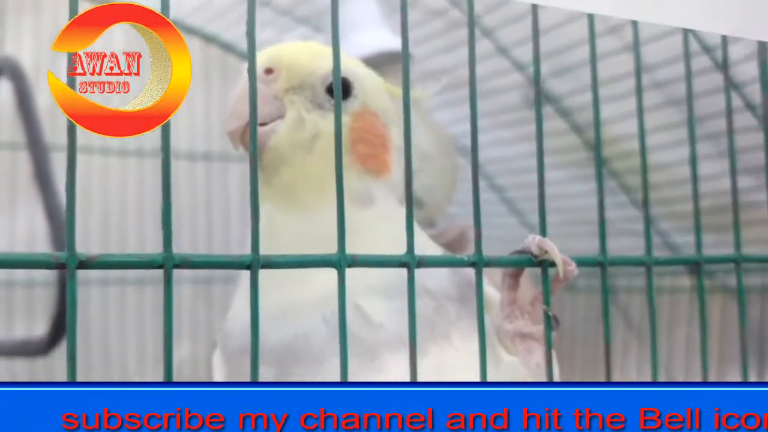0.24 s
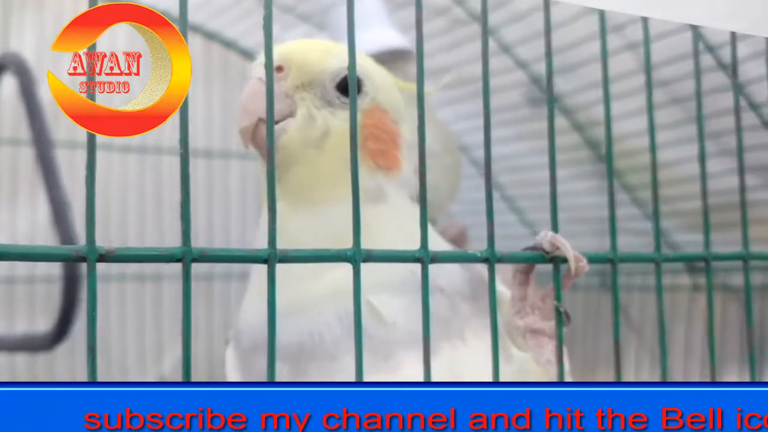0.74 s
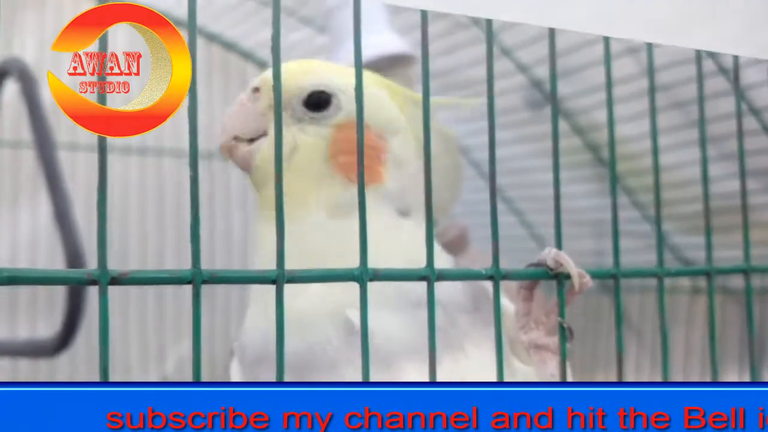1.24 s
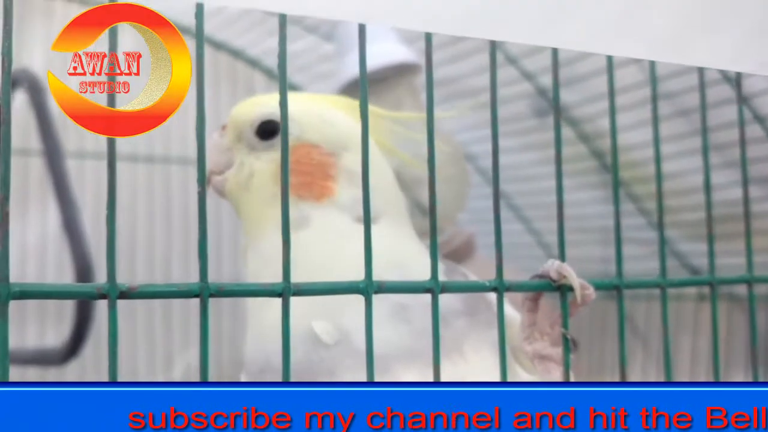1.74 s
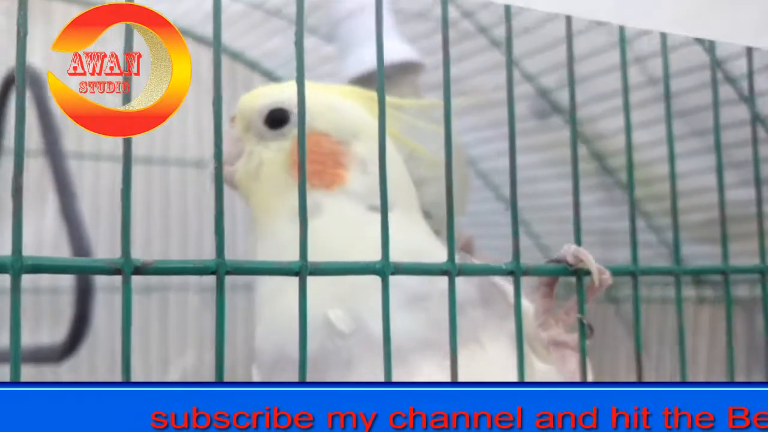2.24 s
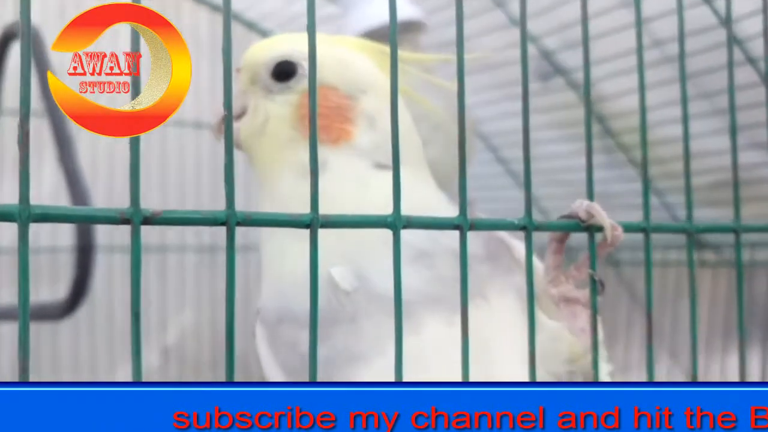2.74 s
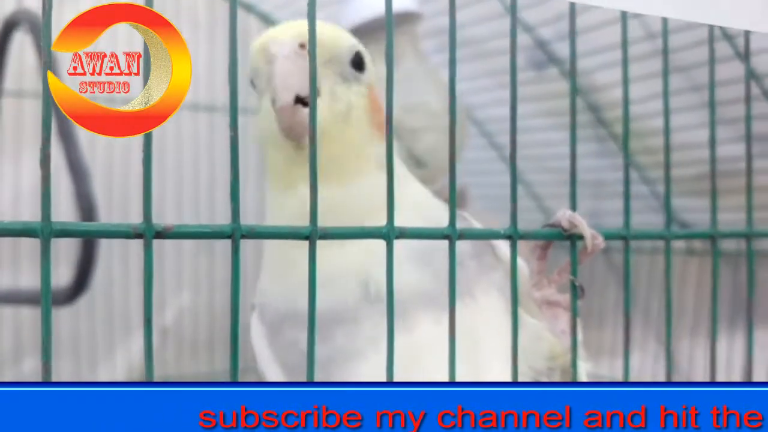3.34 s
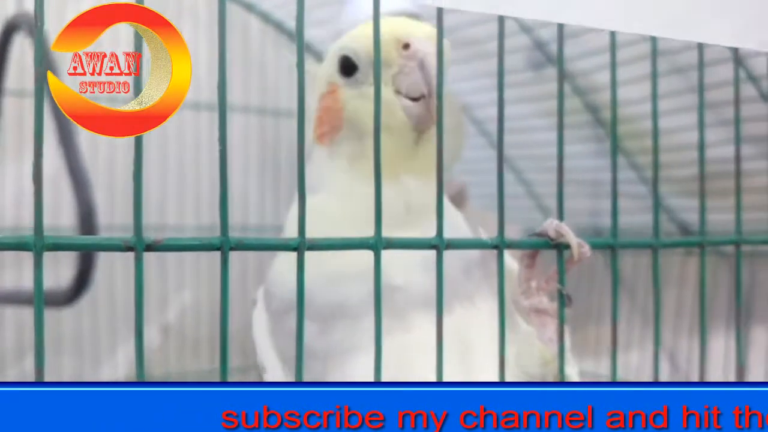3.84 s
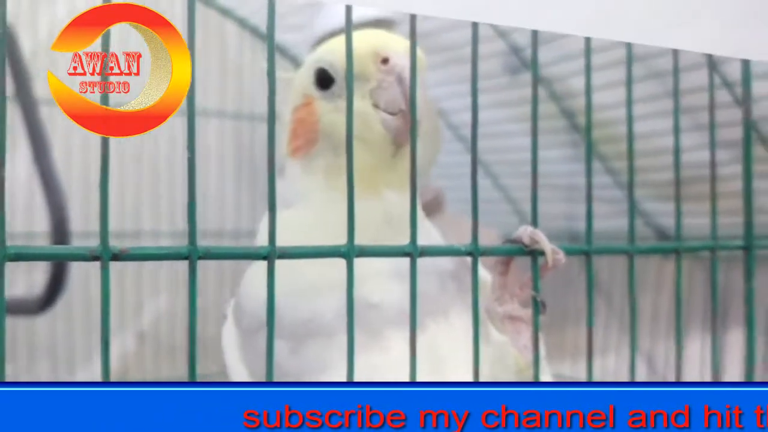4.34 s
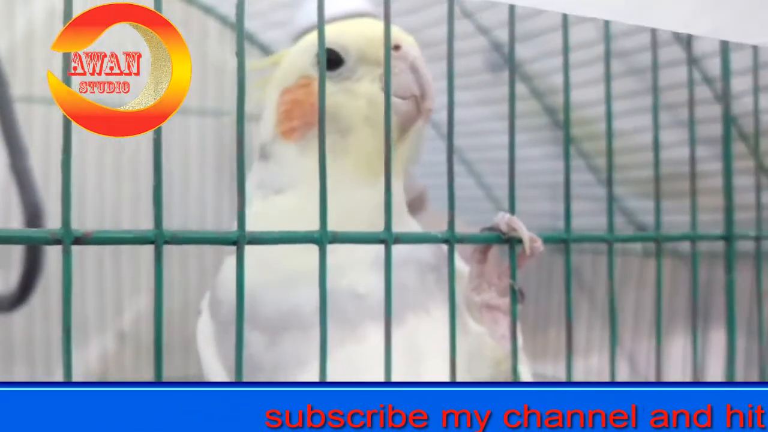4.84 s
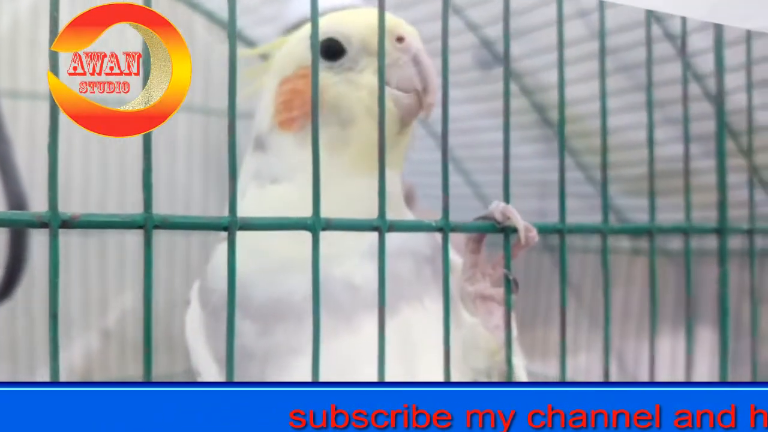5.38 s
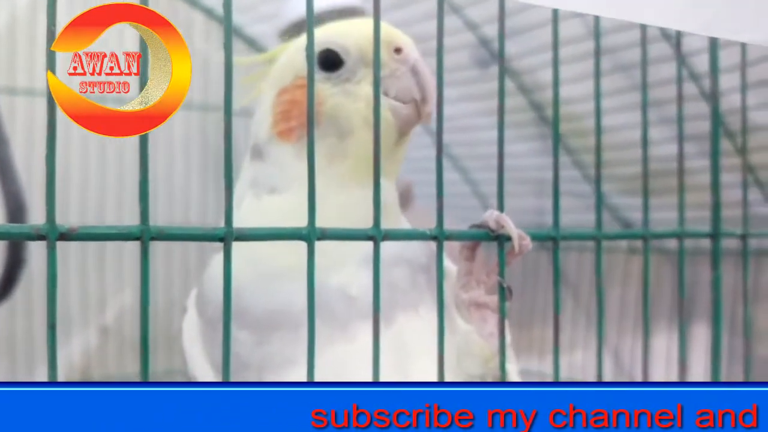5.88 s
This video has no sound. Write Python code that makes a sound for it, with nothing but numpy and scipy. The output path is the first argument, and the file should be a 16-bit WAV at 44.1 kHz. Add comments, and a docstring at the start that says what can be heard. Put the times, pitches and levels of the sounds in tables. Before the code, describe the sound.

A cockatiel whistles close to the microphone in a quiet, hard-walled room. Each note is high, nearly pure and under a tenth of a second long, most holding briefly and then dropping sharply, with a short room echo. From the start to about 1.7 seconds the notes come roughly five a second. In the short pause that follows, a faint distant whistle sinks slightly until 2.2 seconds. From 2.4 to 5 seconds the bird chirps in a louder, quick run, some notes sharper in tone, then spaces them a little more until about 6 seconds. A few softer, lower notes fall in between. Soft handling thumps touch the left side at about 0.2 seconds, cluster from 2.4 to 3.2, and return at 3.5 with a small bright click and at 4.1. Faint room hiss and a low hum continue throughout.

```python
"""Short falling whistles from a cockatiel on its cage bars, close to a small stereo recorder.
Each note is a near sine from the syrinx that drops as the breath gives out; the hard-walled room answers.
Behind the bird are room tone, a low hum and one faint far whistle. Soft handling thumps reach the left
microphone, one with a bright click. A fast ripple in the recorder's gain mirrors every tone around
multiples of the ripple frequency."""
import sys
import numpy as np
from scipy import signal
from scipy.fft import rfft, irfft
from scipy.io import wavfile
from scipy.ndimage import uniform_filter1d

SR = 44100
rng = np.random.default_rng(int(sys.argv[2]) if len(sys.argv) > 2 else 0)


def pcm_store(signal):
    """Save signal as 16-bit PCM."""
    levels = np.round(np.clip(np.atleast_2d(signal), -1, 1) * 32767)
    wavfile.write(sys.argv[1], SR, levels.astype(np.int16).T)


N = 269451


def amp(db):
    return 10 ** (np.asarray(db) / 20)


def unit_rms(x):
    return x / np.sqrt(np.mean(x ** 2) + 1e-20)


def curve_at(points, hz):
    """Reads a table of (frequency, value) along a log frequency axis."""
    freq_hz, value = np.transpose(points)
    return np.interp(np.log(hz + 1), np.log(freq_hz + 1), value)


def add(mix, start_s, sound):
    part = mix[max(round(start_s * SR), 0):][:len(sound)]
    part += sound[:len(part)]


def drift(size, smooth_s):
    """A smooth random wander of rms 1."""
    span = max(round(smooth_s * SR), 1)
    return unit_rms(uniform_filter1d(uniform_filter1d(rng.standard_normal(size), span), span))


def bend(x, start, mid, end):
    """The parabola through three values at x = 0, 1/2 and 1."""
    return start * (1 - x) * (1 - 2 * x) + 4 * mid * x * (1 - x) + end * x * (2 * x - 1)


# The quiet room's spectrum at the microphones: freq_hz, relative_density_db
ROOM_TONE_SPECTRUM = [(25, -30.5), (110, -16), (240, -24.5), (450, -21.5), (900, -27), (1250, -17),
                      (1850, -14.5), (2100, -41.5), (2600, -24), (3400, -32), (6000, -48), (13500, -48),
                      (15100, -45), (15900, -52)]


def room_tone(rms_db=-57, patch_db=3.9):
    """Noise all around, unrelated at the two microphones, with louder and softer patches."""
    hz = np.fft.rfftfreq(1024, 1 / SR)
    real, imag, patches = rng.standard_normal((3, 2, len(hz), N // 256 + 5))
    patches = unit_rms(uniform_filter1d(uniform_filter1d(patches, 8, axis=1), 10, axis=2))
    spectra = (real + 1j * imag) * amp(curve_at(ROOM_TONE_SPECTRUM, hz)[:, None] + patch_db * patches)
    noise = signal.istft(spectra, nperseg=1024, noverlap=768)[1][:, :N]
    return amp(rms_db) * unit_rms(noise)


def hum(pitch_hz=150.4, width_hz=33, level_db=-66):
    """A low hum in the room that wavers differently at each microphone."""
    waver = np.array([drift(N, .5 / width_hz) for _ in range(2)])
    tone = np.sin(2 * np.pi * pitch_hz * np.arange(N) / SR)
    return amp(level_db + drift(N, .37)) * waver * tone


# A faint whistle sinking, far from the microphones: time_s, pitch_hz, level_db
FAR_WHISTLE_PATH = [(1.72, 1340, -80), (1.8, 1310, -60), (2.0, 1260, -59), (2.17, 1225, -61),
                    (2.22, 1215, -80)]


def far_whistle():
    """A thin, distant tone that the room smears differently at each microphone."""
    time_s, pitch_hz, level_db = np.transpose(FAR_WHISTLE_PATH)
    t = np.arange(N) / SR
    phase = 2 * np.pi * np.cumsum(np.interp(t, time_s, pitch_hz)) / SR
    level = amp(np.interp(t, time_s, level_db, left=-200, right=-200))
    return np.array([level * amp(3 * drift(N, .015)) * np.sin(phase + .4 * drift(N, .03))
                     for _ in range(2)])


# Handling knocks, right at the left microphone: centre_s, level_db, pitch_hz
HANDLING_KNOCKS = [(0.162, -31, 260), (0.24, -42, 111), (2.389, -36, 130), (2.477, -41.5, 99),
                   (2.516, -43, 119), (2.532, -40, 176), (2.557, -43, 118), (2.587, -39, 264),
                   (2.649, -37.5, 160), (2.754, -43.5, 99), (2.776, -43.5, 121), (2.879, -32, 142),
                   (3.034, -39.5, 127), (3.06, -46, 102), (3.076, -32.5, 129), (3.11, -38.5, 111),
                   (3.188, -42, 112), (3.205, -39, 123), (3.488, -34, 408), (3.503, -46.5, 72.5),
                   (4.147, -31.5, 217)]


def handling_thumps():
    """Each knock swings the left capsule for a cycle or two, with a slow sway; little reaches the right."""
    out, t = np.zeros(N), np.arange(-.03, .06, 1 / SR)
    width_cycles = np.where(t < 0, .45, .9)
    for centre_s, level_db, pitch_hz in HANDLING_KNOCKS:
        phase, sway_hz = rng.uniform(0, 2 * np.pi), rng.uniform(60, 110)
        swing = np.exp(-(t * pitch_hz / width_cycles) ** 2) * np.cos(2 * np.pi * pitch_hz * t + phase)
        sway = np.exp(-((t - .005) / .012) ** 2) * np.cos(2 * np.pi * sway_hz * t + phase)
        add(out, centre_s + t[0], amp(level_db) * (swing + amp(-7.5) * sway))
    return out * amp([[0], [-22]])


def knock_click(start_s=3.487, level_db=-36, pitch_hz=1000, decay_s=.0011):
    """The short, bright click on one of the knocks, a little left of centre."""
    out, t = np.zeros(N), np.arange(0, .006, 1 / SR)
    add(out, start_s, amp(level_db) * np.exp(-t / decay_s) * np.sin(2 * np.pi * pitch_hz * t))
    return out * amp([[0], [-3]])


# Early reflections reaching each microphone: left_delay_ms, right_delay_ms, level_db
WALL_ECHOES = [(2.1, 0.867, -17), (4.3, 3.6, -11), (6.8, 9.4, -9), (10.5, 9.6, -27.5), (14.2, 11, -19.5),
               (19., 26, -28.5)]
# Decay of the room around the cage: freq_hz, t60_s
ROOM_DECAY = [(500, 0.1), (2000, 0.19), (5000, 0.19), (12000, 0.22)]


def room_reverb(source, tail_db=-16.5, beyond_db=-19, beyond_t60_s=.84):
    """Hard walls return a few echoes and a short tail; the rooms beyond add a slow, duller ring."""
    taps = np.zeros((2, SR))
    arrivals = np.arange(400, SR - 20, 20) + rng.integers(0, 20, (2, (SR - 401) // 20))
    np.put_along_axis(taps, arrivals, rng.choice([-1., 1.], arrivals.shape), 1)
    hz, t, spectra = signal.stft(taps, SR, nperseg=256)
    near = amp(-60 * t / curve_at(ROOM_DECAY, hz)[:, None])
    beyond = amp(beyond_db - 60 * t / beyond_t60_s) / (1 + (hz[:, None] / 4000) ** 4)
    response = signal.istft(spectra * (near + beyond), SR, nperseg=256)[1]
    response *= amp(tail_db) / np.linalg.norm(response[0])
    for left_ms, right_ms, level_db in WALL_ECHOES:
        response[0, round(left_ms * SR / 1000)] += amp(level_db)
        response[1, round(right_ms * SR / 1000)] += amp(level_db)
    return signal.fftconvolve(source, response, axes=1)[:, :N]


# The hiss under the notes, at both microphones: freq_hz, relative_db
NOTE_HISS_SPECTRUM = [(900, -16), (2000, -6), (3200, -10.5), (4600, -19), (6000, -13), (8000, -17.5),
                      (11000, -12), (15000, -26)]


def note_hiss(relative_db=-29):
    """A soft hiss, which rises and falls with each note it is mixed into."""
    colour = amp(curve_at(NOTE_HISS_SPECTRUM, np.fft.rfftfreq(N, 1 / SR)))
    return amp(relative_db) * unit_rms(irfft(rfft(rng.standard_normal(N)) * colour, N))


# How well the throat passes the second harmonic: freq_hz, gain_db
THROAT_RESPONSE = [(2600, -10), (3500, -2), (4400, 0)]
# Harmonics 3 to 8 at the microphone, with the capsule's peak near 15 kHz: freq_hz, relative_db
UPPER_HARMONICS = [(4000, -26.5), (6500, -36), (8500, -45), (11000, -45), (13500, -45.5), (15000, -30.5),
                   (16500, -55)]


def whistle_tone(phase, hz, second_db):
    """A fundamental and its overtones; the upper ones rise when the second harmonic is strong."""
    tone = np.cos(phase) + amp(second_db + curve_at(THROAT_RESPONSE, 2 * hz)) * np.cos(2 * phase)
    for order in range(3, 9):
        tone += amp(curve_at(UPPER_HARMONICS, order * hz) + .5 * (second_db + 22)) * np.cos(order * phase)
    return np.sqrt(2) * tone


def syrinx(shape, attack_s=.0045, release_s=.004, thinning_db_per_khz=4):
    """Pitch and level of one note: a held body that bends, then a drop as the breath gives out."""
    body_s, drop_s, start_hz, mid_hz, knee_hz, end_hz, start_db, mid_db, knee_db, drop_db = shape
    t = np.arange(0, body_s + drop_s + release_s, 1 / SR)
    body, drop = np.clip(t / body_s, 0, 1), np.clip((t - body_s) / drop_s, 0, 1)
    plunge = np.clip(drop / .55, 0, 1)
    fall = .5 * drop + .5 * np.sin(np.pi / 2 * plunge) ** 2  # half even slide, half quick plunge
    pitch_hz = bend(body, start_hz, mid_hz, knee_hz) + (end_hz - knee_hz) * fall
    swell = np.maximum(bend(body, *np.sqrt(amp([start_db, mid_db, knee_db]))), 1e-3) ** 2
    fade_db = (drop_db - knee_db) * (1 - np.exp(-drop / .44))
    # the voice thins in mid-plunge, the more the further it falls
    fade_db -= thinning_db_per_khz * abs(knee_hz - end_hz) / 1000 * np.sin(np.pi * plunge) ** 2
    fade_db -= 23 * np.clip(1 - t / attack_s, 0, 1)
    fade_db -= 30 * np.clip((t - body_s - drop_s) / release_s, 0, 1)
    wavering_hz = uniform_filter1d(pitch_hz, size=130) * (1 + .0043 * drift(len(t), .0028))
    level = uniform_filter1d(swell * amp(fade_db), size=120) * amp(.95 * drift(len(t), .0022))
    return wavering_hz, level


# The bird's notes, close to the microphones. The knee ends the body; "second" is the second harmonic
# relative to the fundamental, ahead of the throat.
# start_s, body_s, drop_s, start_hz, mid_hz, knee_hz, end_hz, start_db, mid_db, knee_db, drop_db,
# second_start_db, second_end_db, left_lead_ms, left_minus_right_db
COCKATIEL_NOTES = [ (0, 0.012, .024, 2310, 2241, 2190, 1314, 5, -17.5, -18, -35.5, -27.5, -27, .19, 0),
                   (0.136, 0.041, .018, 2373, 2357, 2277, 1412, -32, -32.5, -19, -29.5, -29.5, -27.5, .19, -1.5),
                   (.334, 0.035, 0.027, 2134, 2094, 2054, 1225, -32, -32, -32, -38, -29, -18, .12, 3),
                   (0.505, 0.061, 0.015, 2120, 2301, 2110, 1357, -35, -31.5, -21.5, -36.5, -27, -24, 0.16, -.5),
                   (.753, 0.041, 0.017, 2124, 1858, 1815, 1540, -19.5, -27, -20, -32, -19.5, -17, 0.2, -1),
                   (.911, .06, 0.014, 2217, 2361, 2156, 1390, -41, -30, -17.5, -31.5, -20, -37, .17, -.2),
                   (1.114, 0.041, 0.018, 2231, 2218, 2145, 1827, -32, -17.5, -19, -25.5, -21, 1.5, .2, -1),
                   (1.28, 0.039, 0.019, 2223, 2243, 2133, 1413, -17, -25, -9.5, -33.5, -22, -31.5, 0.21, -3),
                   (1.493, 0.052, .012, 1728, 1597, 1624, 1686, -41, -34.5, -33, -40.5, -29, -26, 0.11, -7),
                   (1.662, 0.0543, 0.022, 2293, 2398, 2305, 2254, -47, -20.5, -26.5, -34, -22, -25, 0.19, -3),
                   (2.218, 0.046, 0.018, 1275, 1307, 1393, 1260, -35, -39.5, -40, -47, -46, -21, 0.11, -1.5),
                   (2.379, 0.042, 0.025, 2145, 2082, 2023, 1944, -24.5, -22.5, -22, -36, -6.5, -4.5, 0.19, -1),
                   (2.541, 0.068, 0.023, 2220, 2152, 2164, 1403, -39, -24, -12.5, -48, -38, -32, .11, 5),
                   (2.746, 0.062, 0.02, 2322, 2251, 2219, 1916, -25.5, -16.5, -12.5, -27.5, -9.5, -25, 0.22, 3),
                   (2.902, 0.051, 0.033, 2448, 2489, 2197, 1222, -24, -19, -12, -40.5, -44, -32, .21, 0),
                   (3.067, 0.048, 0.031, 2496, 2462, 2228, 1243, -23, -17.5, -8.5, -39, -36.5, -16, 0.17, 1.5),
                   (3.223, .042, 0.027, 2537, 2466, 2258, 1570, -19, -17.5, -11.5, -34, -35.5, 6.5, .18, -0.5),
                   (3.378, 0.035, 0.024, 2180, 2153, 2140, 1821, -28, -14.5, -17.5, -30.5, -19, 4.5, 0.18, -1.5),
                   (3.547, 0.053, 0.026, 1513, 1610, 1734, 1657, -28.5, -37, -21, -33.5, -32, -9, .15, -0.5),
                   (3.722, 0.043, 0.024, 2010, 2180, 2140, 1507, -36, -22, -11.5, -31.5, -20, -40, 0.11, .5),
                   (3.912, 0.04, .021, 2230, 2210, 2108, 1795, -21.5, -16, -12, -31, -21.5, -10.5, 0.15, -0.5),
                   (4.065, .052, 0.024, 2450, 2393, 2138, 1340, -21.5, -16.5, -16, -36, -16.5, -48, 0.12, -1),
                   (4.206, .051, 0.025, 2052, 2150, 2208, 1345, -31, -32.5, -28.5, -29.5, -39, -24.5, .152, 0.5),
                   (4.432, .059, 0.017, 2407, 2399, 2087, 1433, -26, -18.5, -14, -34, -23, -34, .14, 0),
                   (4.589, .051, 0.04, 2345, 2455, 2360, 1230, -27, -20, -12, -34.5, -23.5, -39.5, .15, -3),
                   (4.81, 0.032, 0.032, 2418, 2320, 2181, 1310, -23.5, -20.5, -13.5, -34, -22.5, -56, .15, -.5),
                   (4.974, .059, 0.023, 2092, 2262, 2216, 1267, -40, -26.5, -12.5, -34, -35, -30, 0.12, 0.5),
                   (5.218, 0.041, 0.026, 2285, 2231, 2167, 1376, -31, -19.5, -18, -31.5, -29, -21.5, 0.13, 0),
                   (5.396, 0.059, 0.024, 2070, 2200, 2153, 1337, -30.5, -32, -13, -38.5, -24, -44, .13, -.5),
                   (5.64, .04, 0.02, 1630, 1489, 1522, 1398, -34.5, -35, -34.5, -37, -28, -30.5, .106, .5),
                   (5.793, 0.058, 0.025, 2268, 2370, 2196, 1372, -42.5, -27.5, -15.5, -42, -18, -39, 0.13, 0),
                   (6.02, 0.039, 0.025, 2340, 2335, 2164, 1310, -28.5, -24, -16, -33.5, -30, -29, .13, -1.5),
                   ]


def cockatiel():
    """The whistles straight from the cage bars, reaching the left microphone just ahead."""
    out, steady_hiss = np.zeros((2, N)), note_hiss()
    for start_s, *shape, second_start_db, second_end_db, lead_ms, pan_db in COCKATIEL_NOTES:
        hz, level = syrinx(shape)
        # the beak opens or shuts during the note, and the overtones flutter more than the tone
        second_db = np.linspace(second_start_db, second_end_db, len(hz)) + 2.2 * drift(len(hz), .003)
        cycles = np.cumsum(hz) / SR
        hiss = steady_hiss[round(start_s * SR):][:len(hz)]
        for mic, delay_s, side_db in zip(out, (0, lead_ms / 1000), (pan_db / 2, -pan_db / 2)):
            tone = whistle_tone(2 * np.pi * (cycles - hz * delay_s), hz, second_db)
            add(mic, start_s, amp(side_db) * level * (tone + np.roll(hiss, round(delay_s * SR))))
    return out


def scene():
    """The close bird and its reflections over the room's small sounds."""
    voice = cockatiel()
    reflections = room_reverb(voice)
    return room_tone() + hum() + far_whistle() + handling_thumps() + knock_click() + reflections + voice


# Gain ripple inside the recorder, harmonics 1 to 4: sideband_db
RIPPLE_SIDEBANDS = [-26, -33.5, -36.5, -35.5]


def record(dry, balance_db=1.17, low_cut_hz=40, limit_db=-16.5, ripple_hz=3900, top_hz=15900):
    """The recorder: low cut, gain control on the peaks, a slightly unsteady gain ripple, band limit."""
    channels = dry * amp([[balance_db / 2], [-balance_db / 2]])  # the left channel is a little louder
    low_cut = signal.sosfilt(signal.butter(2, low_cut_hz, "high", fs=SR, output="sos"), channels)
    power_db = 10 * np.log10(abs(uniform_filter1d((low_cut ** 2).mean(0), size=130)) + 1e-12)
    excess_db = uniform_filter1d(np.maximum(power_db - limit_db, 0), size=130)
    held = low_cut * amp(-.54 * excess_db)
    phase = 2 * np.pi * (ripple_hz * np.arange(N) / SR + .032 * drift(N, .0031))
    ripple = 1 + sum(2 * amp(db) * np.cos(order * phase) for order, db in enumerate(RIPPLE_SIDEBANDS, 1))
    band_limit = signal.firwin(511, top_hz, window=("kaiser", 9), fs=SR)
    return signal.oaconvolve(held * ripple, band_limit[None], "same")


dry = scene()
out = record(dry)
pcm_store(out)
```